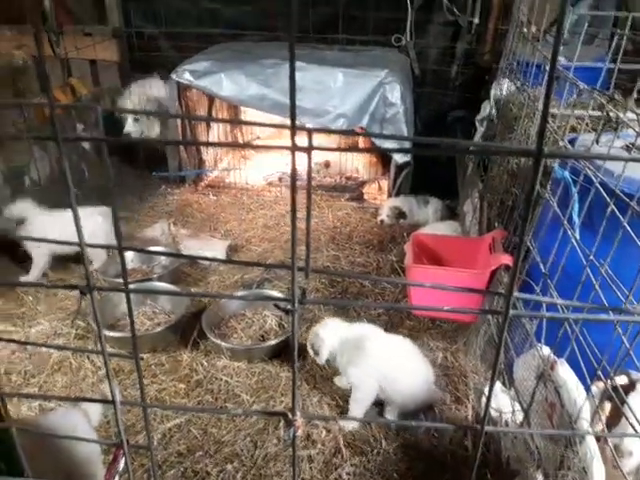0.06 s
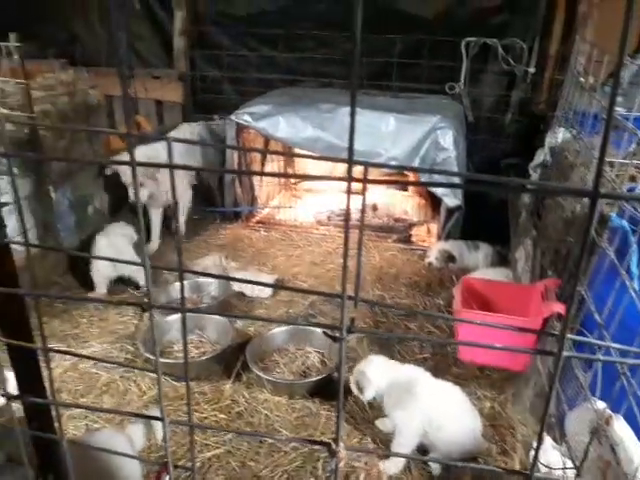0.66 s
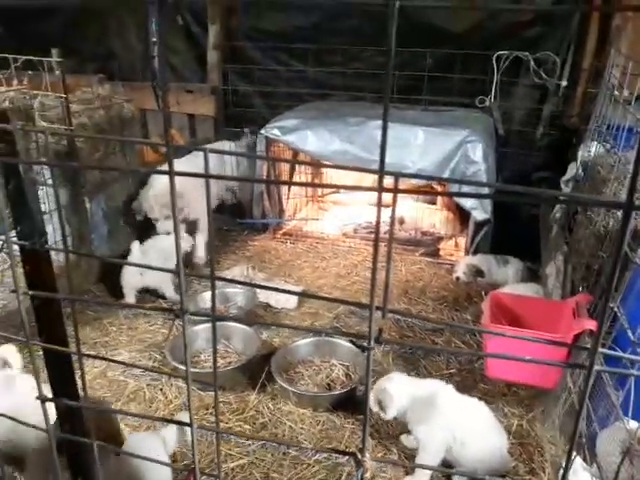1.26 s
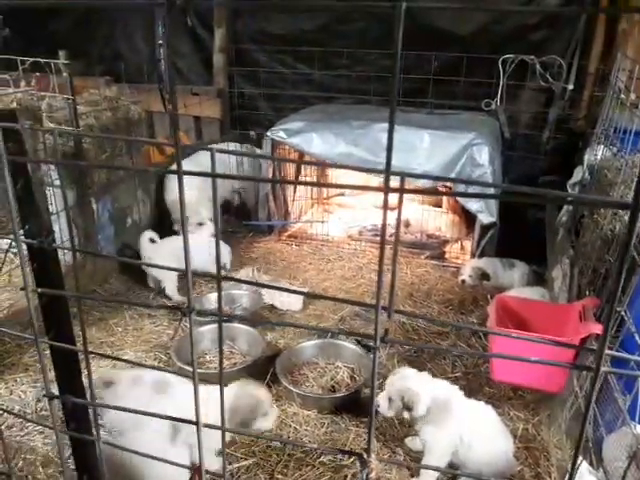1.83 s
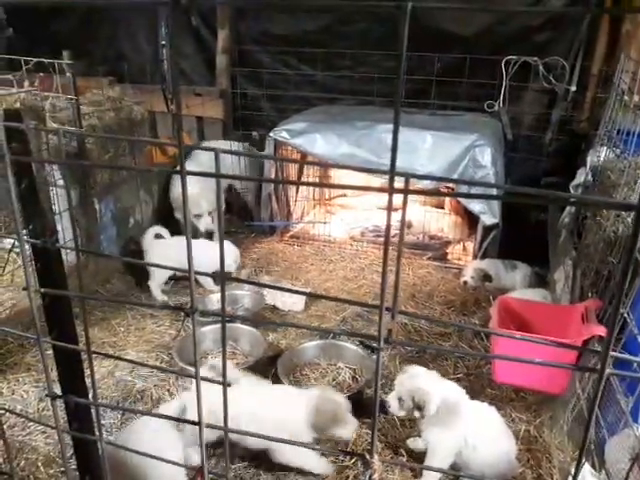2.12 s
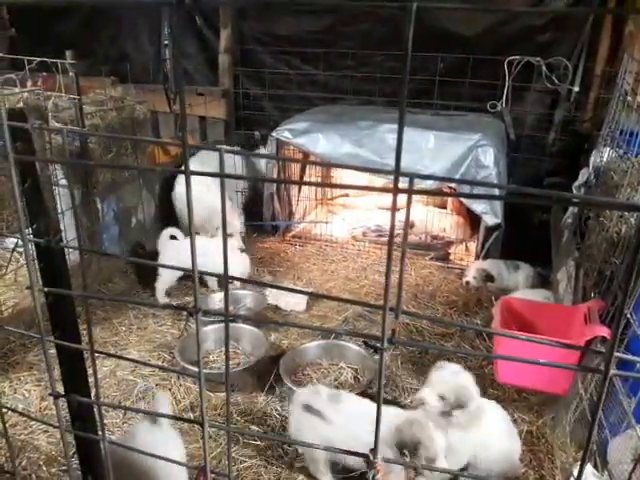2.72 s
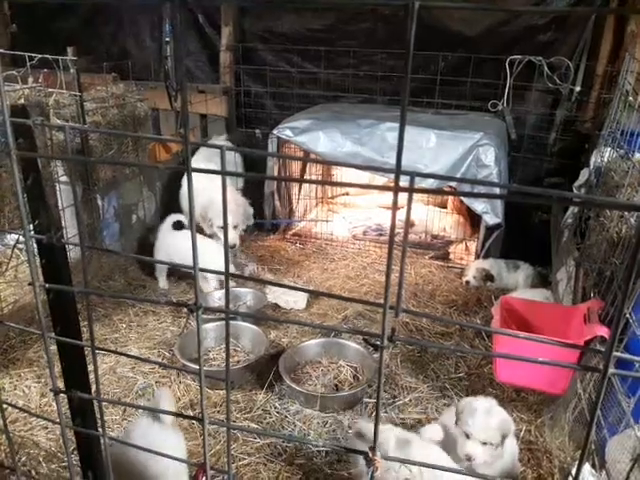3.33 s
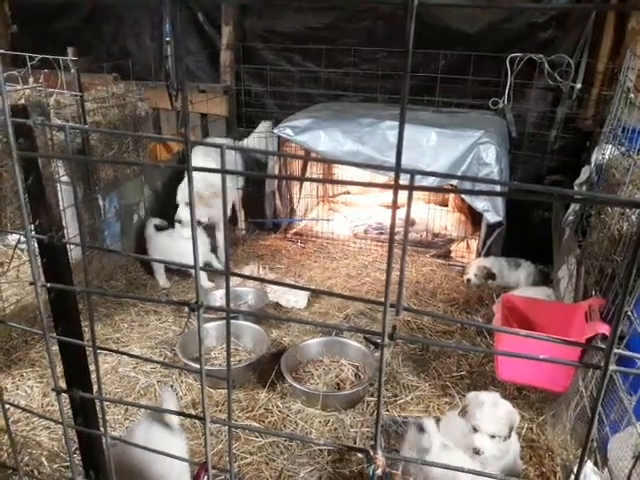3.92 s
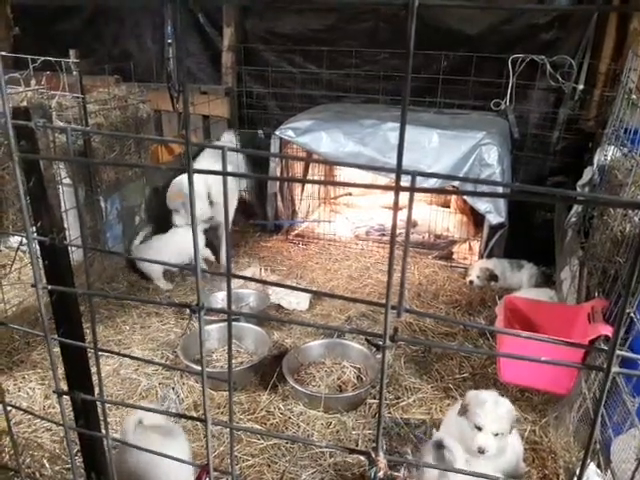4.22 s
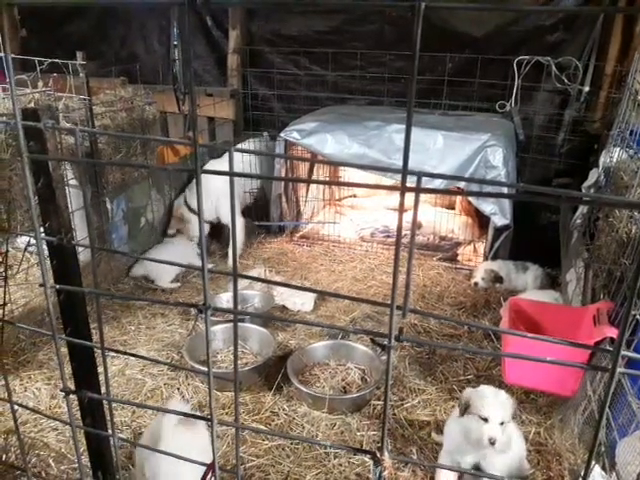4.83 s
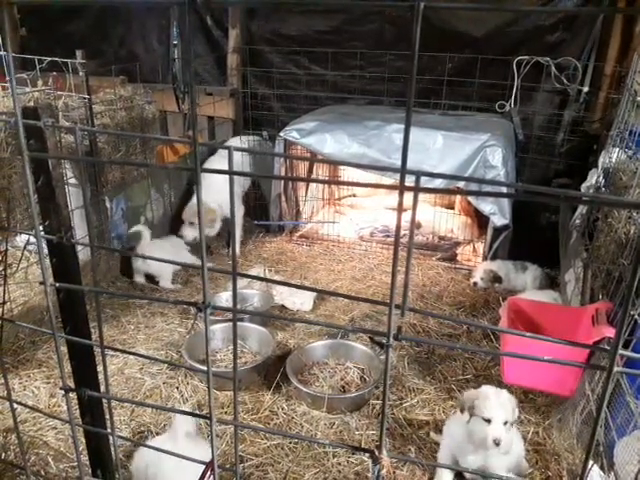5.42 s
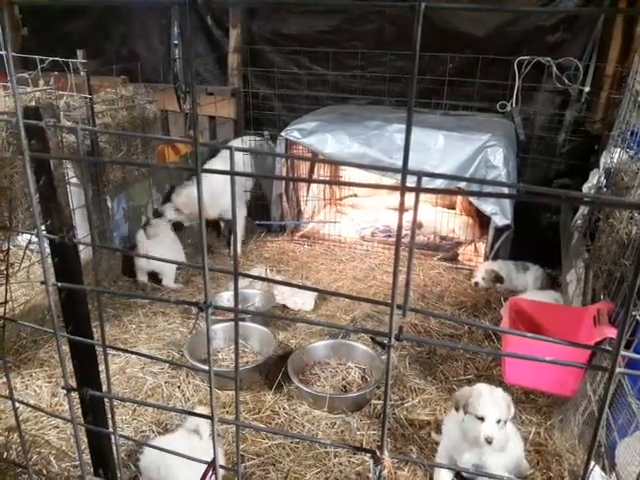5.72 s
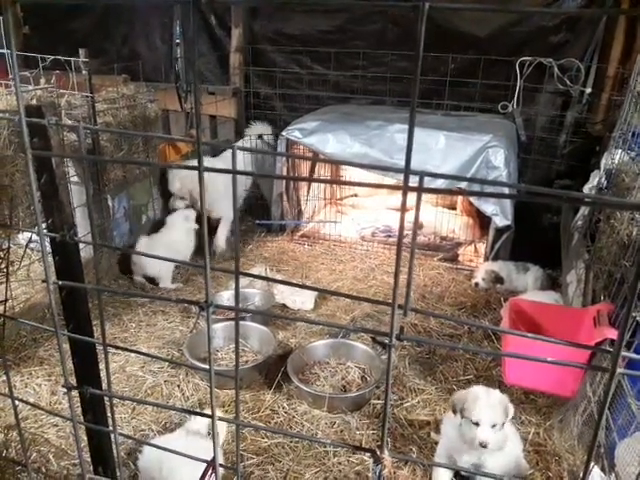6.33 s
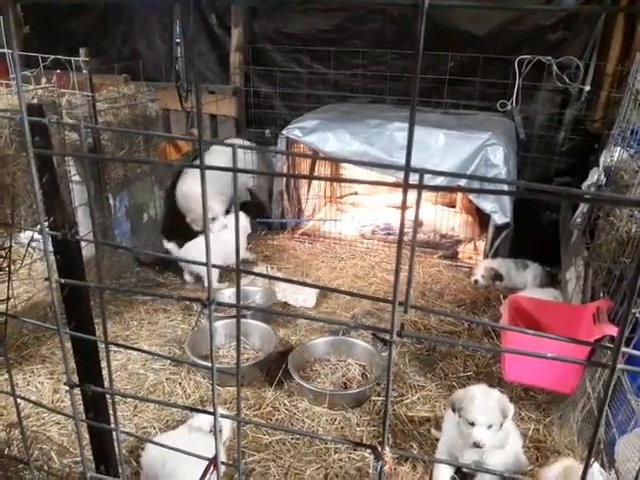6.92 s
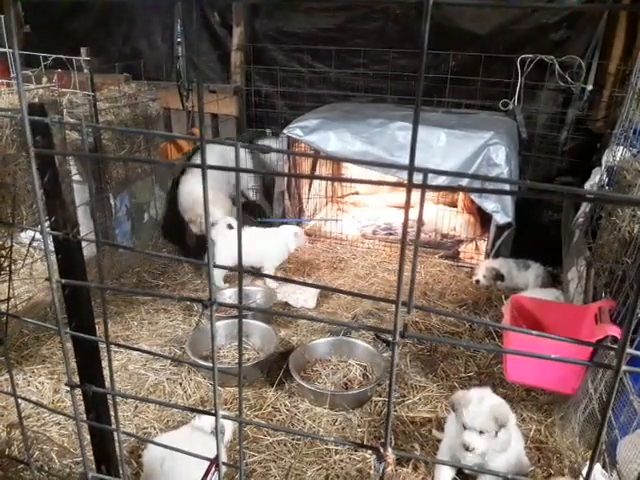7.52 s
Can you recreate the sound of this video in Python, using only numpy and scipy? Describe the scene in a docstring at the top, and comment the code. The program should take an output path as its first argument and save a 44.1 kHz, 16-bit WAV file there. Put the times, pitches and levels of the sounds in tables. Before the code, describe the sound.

Young puppies give a few short, high whines and small grunts while straw crackles under their paws. Midway their mother lets out two low, breathy woofs, the loudest sounds, and bodies bump and scrape hollow boards. More thin whines follow, then a last cluster of knocks with claws catching wire mesh. The barn adds a short echo and faint still air.

```python
"""A puppy's short whine over rustling straw comes first; more whines, yips and grunts follow in a barn pen.
Tight vocal folds sing the nearly pure whines, and thin nasal whistles lead into some of them.
Midway the mother pushes two low, breathy woofs through a half-closed mouth. Straw crackles under the
paws all the time, bodies bump and scrape the hollow boards, and claws catch the wire mesh.
The barn adds a short tail and a faint bed of air."""
import sys
import numpy as np
from scipy import signal
from scipy.fft import rfft, irfft, next_fast_len
from scipy.io import wavfile
from scipy.ndimage import uniform_filter1d

SR = 44100
rng = np.random.default_rng(int(sys.argv[2]) if len(sys.argv) > 2 else 0)


def unload_audio(sound):
    """Save the sound as a 16-bit wav file, at the path given as the first command line argument."""
    columns = np.transpose(np.atleast_2d(sound))
    # keep every value between -1 and 1, then stretch to whole-number steps
    steps = np.round(np.clip(columns, -1, 1) * 32767)
    wavfile.write(sys.argv[1], SR, steps.astype(np.int16))


N = 337806

# the melody of each whine, one list per call: time_s, pitch_hz
WHINE_TUNES = [
    [(0, 879), (.06, 887), (.08, 937), (.105, 880)],
    [(.868, 1369), (.92, 1345), (.955, 1240), (1.0, 1157), (1.055, 1070), (1.085, 866)],
    [(1.3, 955), (1.33, 1145), (1.39, 991), (1.44, 746), (1.475, 767), (1.51, 728.4), (1.585, 728)],
    [(1.71, 301.4), (1.775, 630), (1.803, 735), (1.83, 648), (1.89, 597)],
    [(4.897, 1336), (4.933, 1440), (4.955, 1292), (4.992, 1177)],
    [(5.255, 1300), (5.28, 1336), (5.305, 1245), (5.335, 1336), (5.36, 1155), (5.395, 1056), (5.46, 1088),
     (5.56, 1088), (5.59, 985)],
    [(6.94, 1060), (6.98, 989), (7.03, 766), (7.057, 865), (7.085, 761), (7.16, 788), (7.19, 690)],
]
# how each whine is voiced: fundamental_db, overtones_db, attack_s, release_s, press_time_s,
# fundamental_lift_db, overtone_lift_db, overtone_fade_db_per_s, tilt_db_per_octave, hoarseness (0-1)
WHINE_VOICINGS = [(-39, -40.5, 0.0019, 0.02, 0.056, 0, -6, 60, -28, 0.3),
                  (-39, -32.5, 0.024, 0.048, .97, 10, 3.5, 25, -0.5, .07),
                  (-37.5, -40.5, 0.015, 0.027, 1.538, 4.5, 4, -4, -1.5, 0.15),
                  (-39.5, -45.5, 0.062, 0.03, 1.795, 4, 5.5, -6, -21, 0.98),
                  (-40, -33, 0.0092, 0.03, 4.96, 2, 3, 35, 0, 0.1),
                  (-37, -33.5, .012, .015, 5.305, 5.5, 10, 10, 4, .02),
                  (-41.5, -51.5, 0.024, 0.022, 7.12, -4, 10.5, -6, -5.5, 0.05)]
# a puppy's throat, shaping the overtones: frequency_hz, gain_db
PUP_THROAT = [(600, -27), (1300, -2), (1550, -4), (1900, -39), (2250, 14), (2550, 10.5), (3000, -4.5),
              (3600, 10), (4100, -9.5), (4450, 5), (5000, -11), (5450, -0.5), (6300, -9.5), (7500, -16),
              (12000, -41)]
# nasal whistles: start_s, length_s, start_hz, middle_hz, end_hz, level_db
NASAL_WHISTLES = [(0.806, 0.097, 9150, 9400, 9200, -34), (4.871, 0.047, 9400, 9830, 9800, -33),
                  (5.24, .04, 8600, 8670, 8700, -32), (5.317, .03, 10450, 10500, 10650, -40),
                  (6.88, .12, 8000, 8170, 8050, -37)]
# small grunts and peeps: start_s, length_s, start_hz, middle_hz, end_hz, level_db
PUP_GRUNTS = [(0.282, 0.047, 357, 536, 620, -43), (0.748, 0.1, 297, 280.5, 240, -49.5),
              (2.013, 0.035, 237, 256, 211.5, -44)]
# the mother's woofs: start_s, length_s, voice_db, rasp_db, air_held_s, second_push_after_s,
# brightening_db_per_octave, dulling_db_per_octave_per_s
MOTHER_WOOFS = [(3.228, 0.26, -16.5, -30, 0.14, .151, 4, 18), (3.499, .3, -16, -31.5, 0.17, .152, 1, 59)]
# the formants of her throat: centre_hz, width_hz, gain_db
MOTHER_THROAT = [(661, 36, 7.5), (835, 55, 1), (1170, 124, -5.5), (1436, 380, -7), (2140, 55, -5.5),
                 (4350, 320, -24.5)]

# bodies bumping the boards: start_s, boom_db, scrape_db, rise_s, t60_s, centre_hz
BODY_BUMPS = [(3.919, -34.5, -37, 0.04, 1, 197), (4.039, -34, -25.5, 0.003, 0.45, 295),
              (4.072, -19.5, -26, 0.017, 0.36, 139), (4.139, -29, -44, .01, .17, 150),
              (4.5, -28.5, -50, 0.021, 0.34, 170), (4.505, -33.5, -31.5, 0.0035, 0.31, 700),
              (5.52, -44, -48.5, 0.0069, 0.94, 342), (7.216, -29.5, -36, 0.0084, 0.53, 266),
              (7.387, -23, -37, 0.019, 0.26, 270), (7.441, -33, -40, 0.0065, 0.95, 194),
              (7.551, -30.5, -41.5, 0.012, 0.36, 268)]
# light paw steps on the bedded floor: start_s, thud_db, scrape_db
PAW_STEPS = [(.205, -61, -44), (0.242, -57.5, -48.5), (.573, -61, -50), (.685, -52, -42.5),
             (1.21, -46, -44.5), (2.179, -56, -46.5), (2.511, -73, -45.5), (2.855, -51, -51),
             (6.46, -60, -64.5)]
# claws catching the wire mesh: start_s, ring_db, centre_hz
CLAW_CLINKS = [(2.228, -43.5, 1640), (7.212, -35, 910), (7.394, -30, 3200), (7.554, -33, 3100)]
# modes of boards and mesh, steadier in pitch the longer their ring: pitch_hz, gain_db, ring_s
BOARD_MODES = [(122.7, -4, 0.08), (170.6, -5.5, 0.077), (262.9, 0, 0.34), (310, -2, 0.081),
               (435, -6.5, 0.092), (753, -7, 0.48), (935, 3.5, 0.18), (1590, -11, 0.18), (3326, 9, 0.0021)]
# the colour of a scrape along the boards: frequency_hz, gain_db
SCRAPE_EQ = [(50, -31), (120, 3.5), (350, 5.5), (520, 3), (900, 2), (1500, -1), (2500, -2), (3400, -5.5),
             (6000, -17), (14000, -51)]
# a dip near 80 Hz that thins the boom of the boards: frequency_hz, gain_db
BOOM_DIP_EQ = [(45, 0.5), (80, -6.5), (115, 0.5)]

# how loud the straw rustle is over time: time_s, level_db
STRAW_LEVEL = [(0, -48), (1.65, -39.5), (2.45, -44), (3.35, -41.5), (3.48, -49), (3.97, -45.5), (4.15, -39),
               (4.5, -39), (4.7, -47.5), (5.5, -45), (5.75, -48.5), (6.38, -51.5), (6.52, -45),
               (7.16, -42.5), (7.31, -52), (7.5, -41.5), (7.66, -44.5)]
# sweeps of a paw or body through the straw: middle_s, length_s, level_db
STRAW_SWISHES = [(0.008, 0.25, -36.5), (0.242, 0.11, -37), (0.423, .06, -45), (0.54, 0.29, -42),
                 (0.692, 0.067, -37.5), (1.62, 0.17, -41.5), (1.812, 0.062, -35.5), (1.948, 0.095, -38.5),
                 (2.186, 0.14, -45), (2.768, .08, -41.5), (3.074, 0.059, -43.5), (3.3, 0.07, -38.5),
                 (3.784, 0.18, -44.5), (4.13, 0.054, -35), (4.39, .19, -37.5), (5.199, .12, -42.5),
                 (5.59, 0.096, -41.5), (6.03, 0.12, -44), (6.492, .08, -42), (6.805, 0.16, -46)]
# stalks snapping: start_s, relative_level_db
STALK_SNAPS = [(1.098, -40), (1.111, -32), (2.099, -36), (2.18, -36), (2.715, -29), (3.156, -35.5),
               (3.397, -42), (3.749, -36), (4.773, -38.5), (5.03, -37.5), (5.719, -47), (5.777, -48),
               (5.874, -32.5), (6.033, -36)]
# the colour of stirred straw: frequency_hz, gain_db
STRAW_EQ = [(60, -27), (140, -4.5), (350, -4), (600, -9.5), (1100, -10), (1600, -9.5), (2400, -0.5),
            (4200, 1), (5600, -5), (10000, -0.5), (16000, -11)]

# standing waves between the pen walls: pitch_hz, width_hz, gain_db
STANDING_WAVES = [(414, 4.5, -6), (1092, 5.5, -12)]
# the far walls throw the whines back: delay_s, gain_db
SLAPBACKS = [(.021, -14), (.049, -12)]
# the dull colour of those echoes: frequency_hz, gain_db
SLAPBACK_EQ = [(700, -6), (1200, 2), (2300, -18), (5000, -11)]
# the pups' reverb send, dipping where straw soaks up overtones: frequency_hz, gain_db
PUP_SEND_EQ = [(700, -1), (1250, 4), (2500, -4), (6000, 5)]
# how long the barn rings: frequency_hz, t60_s
BARN_DECAY = [(150, .7), (420, .75), (750, .48), (1300, .46), (3500, .33), (12000, .2)]
# the colour of still barn air: frequency_hz, gain_db
AIR_EQ = [(25, -33.5), (50, 0.5), (80, 9.5), (125, 9.5), (250, -0.5), (500, -15.5), (1200, -1),
          (4000, -1.5), (16000, -65)]
# the deep treble notch of the microphone port: frequency_hz, gain_db
MICROPHONE_EQ = [(5400, 1.5), (6300, -9), (7200, -21.5), (8300, -35.5), (9200, -29), (10000, -22),
                 (11200, -12), (13000, -9.5), (15700, 1)]

BAND_LIMIT_HZ = 15900


def whine(tune, voicing, press_half_s=.023, tremble_db=1.93, tremble_hz=52):
    """Tight vocal folds: a nearly pure tone whose overtones sweep through the throat as it glides."""
    low_db, high_db, attack, release, press_at, low_lift, high_lift, fade, tilt, hoarse = voicing
    times, pitches = np.transpose(tune)
    start, end = times[0], times[-1]
    t = np.arange(start, end, 1 / SR)
    hz = uniform_filter1d(np.interp(t, times, pitches), size=400, mode="nearest")
    hz *= 1 + (.004 + .015 * hoarse) * wander(len(t), 160)
    phase = 2 * np.pi * np.cumsum(hz) / SR
    k = np.arange(2, 9)[:, None]
    flutter_db = (1.2 + 9 * min(hoarse, .25)) * np.array([wander(len(t), 45) for _ in k])
    weights = gain_of(read(PUP_THROAT, k * hz) + tilt * np.log2(k) + flutter_db) * (k * hz < BAND_LIMIT_HZ)
    overtones = (weights * np.sin(k * phase)).sum(0) / np.linalg.norm(weights, axis=0)
    # at the top of a strained call the overtones break into a rasp
    breath = rng.standard_normal(len(t)) * (1 + np.cos(phase))
    rasp = unit_rms(formant(breath, hz=3600, width_hz=900))
    strain = np.clip(hoarse * (hz / hz.max()) ** 2, 0, 1)
    overtones = np.sqrt(1 - strain ** 2) * overtones + strain * rasp
    press = hump(t, press_at, press_half_s)
    airflow = np.clip((t - start) / attack, 0, 1) * np.clip((end - t) / release, 0, 1)
    # a pup cannot hold its level steady
    low = gain_of(low_db + low_lift * press + tremble_db * wander(len(t), tremble_hz))
    high_db = high_db + high_lift * press - fade * (t - start)
    high = gain_of(high_db + tremble_db * wander(len(t), tremble_hz))
    return start, np.sqrt(2) * airflow * (low * np.sin(phase) + airflow * high * overtones)


def peep(row, jitter, octave_gain):
    """A nasal whistle or small grunt: a short tone bending through three pitches."""
    start, length, start_hz, middle_hz, end_hz, db = row
    progress = np.linspace(0, 1, int(length * SR))
    bend = np.polyfit([0, .5, 1], [start_hz, middle_hz, end_hz], 2)
    hz = np.polyval(bend, progress) * (1 + jitter * wander(len(progress), 250))
    phase = 2 * np.pi * np.cumsum(hz) / SR
    tone = np.sin(phase) + octave_gain * np.sin(2 * phase)
    return start, gain_of(db) * unit_rms(tone * signal.windows.tukey(len(tone), .7))


def woof(row, start_hz=250, top_hz=431, sag_hz_per_s=720, peak_s=.071, push_half_s=.025, buzz=.3):
    """Two pushes of a strong fundamental, with rough puffs of air that dull as the mouth shuts."""
    start, length, voice_db, rasp_db, hold_s, second_s, brightening, dulling = row
    t = np.arange(0, length, 1 / SR)
    since_peak = np.maximum(t - peak_s, 0)
    # the pitch climbs with the push, then sags
    hz = top_hz - (top_hz - start_hz) * hump(t, 0, half_s=.043)
    hz -= sag_hz_per_s * np.maximum(since_peak - push_half_s, 0)
    airflow = gain_of(np.interp(t, [0, peak_s - push_half_s / 2, hold_s, length], [-17, 0, 0, -18.5]))
    main_push = hump(t, peak_s, push_half_s)
    push = main_push + gain_of(-7) * hump(t, second_s, half_s=.011) + gain_of(-13.5) * airflow
    push /= push.max()
    slack = np.clip(-20 * np.log10(push) / 9, .3, 1)  # the folds flap unevenly away from the peak
    cycles = np.cumsum(hz * (1 + .065 * slack * wander(len(t), 200))) / SR
    tone = np.sin(2 * np.pi * cycles) * (1 + .5 * slack * wander(len(t), 160))
    folds = unit_rms(sum(np.cos(2 * np.pi * k * cycles) for k in range(2, 12)))
    puffs = unit_rms((.5 + np.exp(-(cycles % 1) / .77)) * rng.standard_normal(len(t)))
    tilt = brightening * main_push - dulling * since_peak
    rasp = np.zeros(len(t))
    for centre_hz, width_hz, db in MOTHER_THROAT:
        octaves_up = np.log2(centre_hz / MOTHER_THROAT[0][0])
        rasp += gain_of(db + tilt * octaves_up) * formant(puffs + buzz * folds, centre_hz, 2 * width_hz)
    voice = np.sqrt(2) * gain_of(voice_db) * push * tone + gain_of(rasp_db) * airflow * unit_rms(rasp)
    return start, voice * signal.windows.tukey(len(t), .1)


def bump(start, boom_db, scrape_db, rise_s, t60_s, centre_hz, boom_trim_db=-3, focus_db_per_octave=9):
    """One hit: the boards boom in their modes while straw and claws scrape along them."""
    t = np.arange(SR // 2) / SR
    swell = np.minimum(t / rise_s, 1)
    fade = gain_of(-60 * np.maximum(t - rise_s, 0) / t60_s)
    modes = np.zeros(len(t))
    for hz, db, ring_s in BOARD_MODES:
        # heavier, softer contact has a lower centre and favours the lower modes
        weight = gain_of(db - focus_db_per_octave * abs(np.log2(hz / centre_hz)))
        rattle = .22 * wander(len(t), 2.2 / ring_s)
        modes += weight * np.cos(2 * np.pi * (hz * t + rng.random() + rattle))
    boom = gain_of(boom_db + boom_trim_db) * swell * unit_rms(modes)
    grit = unit_rms(equalise(crackle(len(t), clicks_per_s=4000, hiss=2.4), SCRAPE_EQ))
    return start, fade * (boom + gain_of(scrape_db) * np.sqrt(swell) * grit)


def pen_knocks():
    """Bodies, paws and claws all sound the same boards and mesh."""
    out = np.zeros(N)
    for row in BODY_BUMPS:
        add(out, *bump(*row))
    for start, thud_db, scrape_db in PAW_STEPS:
        add(out, *bump(start, thud_db, scrape_db, rise_s=.0056, t60_s=.59, centre_hz=380))
    for start, db, hz in CLAW_CLINKS:
        add(out, *bump(start, db, scrape_db=db - 10, rise_s=.0014, t60_s=.2, centre_hz=hz))
    return equalise(out, BOOM_DIP_EQ)


def straw_rustle(clump_db=1.5, clump_hz=22):
    """Stalks rub and crack in clumps; the level rises and dips, and swells under each sweep of a paw."""
    t = np.arange(N) / SR
    power = gain_of(np.interp(t, *np.transpose(STRAW_LEVEL))) ** 2
    for middle, length, db in STRAW_SWISHES:
        power += (gain_of(db) * hump(t, middle, length / 2)) ** 2
    level = np.sqrt(power) * gain_of(clump_db * wander(N, clump_hz))
    return level * unit_rms(equalise(crackle(N, clicks_per_s=1900, hiss=1), STRAW_EQ))


def straw_snaps(t60_s=.026, boost_db=2.5):
    """Single dry stalks break, each a tight burst of noise."""
    out, t = np.zeros(N), np.arange(2000) / SR
    for start, db in STALK_SNAPS:
        burst = unit_rms(equalise(rng.standard_normal(len(t)), STRAW_EQ))
        add(out, start, gain_of(db + boost_db - 60 * t / t60_s) * burst)
    return out


def pen_ring(calls):
    """Calls that hit a standing wave of the pen ring on."""
    return sum(gain_of(db) * resonate(calls, hz, width_hz) for hz, width_hz, db in STANDING_WAVES)


def wall_echoes(calls):
    """Dull single reflections beat against a gliding call and briefly outlast it."""
    out, dull = np.zeros(N), equalise(calls, SLAPBACK_EQ)
    for delay, db in SLAPBACKS:
        add(out, delay, gain_of(db) * dull)
    return out


def barn_reverb(send, predelay_s=.0068, reflections_per_s=2500):
    """Sparse reflections of random sign, each band dying at its own speed."""
    taps = rng.choice([-1., 1.], SR) * (rng.random(SR) < reflections_per_s / SR)
    taps *= np.arange(SR) > predelay_s * SR
    hz, t, bands = signal.stft(taps, SR, nperseg=256)
    t60 = read(BARN_DECAY, hz)[:, None]
    tail = signal.istft(bands * gain_of(-60 * t / t60) / np.sqrt(t60), SR, nperseg=256)[1]
    return signal.fftconvolve(send, tail / np.linalg.norm(tail))[:N]


def barn_air(level_db=-59):
    """Still air: a faint, steady bed of room tone."""
    return gain_of(level_db) * unit_rms(equalise(rng.standard_normal(N), AIR_EQ))


def crackle(size, clicks_per_s, hiss, spread_db=1.5):
    """Tiny clicks of unequal size over a smooth hiss."""
    clicks = rng.standard_normal(size)
    clicks *= gain_of(spread_db * np.minimum(rng.exponential(1, size), np.log(45)))
    clicks *= rng.random(size) < clicks_per_s / SR
    return unit_rms(unit_rms(clicks) + hiss * rng.standard_normal(size))


def wander(size, rate_hz):
    """Smooth random modulation, of rms near 1, rolling off above rate_hz."""
    span = max(size, SR)
    lowpass = np.exp(-(np.fft.rfftfreq(span, 1 / SR) / rate_hz) ** 2)
    return unit_rms(irfft(rfft(rng.standard_normal(span)) * lowpass, span))[:size]


def resonate(x, hz, width_hz):
    """A resonance with a peak gain of 1."""
    return signal.lfilter(*signal.iirpeak(hz, hz / width_hz, fs=SR), x)


def formant(x, hz, width_hz):
    """A throat resonance: two passes for steeper skirts."""
    return resonate(resonate(x, hz, width_hz), hz, width_hz)


def equalise(x, curve):
    """Filters by an EQ curve of frequency_hz, gain_db."""
    size = next_fast_len(len(x) + 2048)
    gains = gain_of(read(curve, np.fft.rfftfreq(size, 1 / SR)))
    return irfft(rfft(x, size) * gains, size)[:len(x)]


def read(curve, hz):
    """Reads a curve on a logarithmic frequency axis."""
    frequencies, values = np.transpose(curve)
    return np.interp(np.log(hz + 1), np.log(frequencies + 1), values)


def hump(t, middle_s, half_s):
    """A bell-shaped envelope of height 1."""
    return np.exp(-((t - middle_s) / half_s) ** 2)


def gain_of(db):
    """Decibels to amplitude."""
    return 10 ** (np.asarray(db) / 20)


def unit_rms(x):
    """Scales to rms 1."""
    return x / np.sqrt(np.mean(x ** 2) + 1e-20)


def add(mix, start_s, sound):
    """Drops a sound into the mix at its cue."""
    part = mix[max(0, round(start_s * SR)):][:len(sound)]
    part += sound[:len(part)]


def scene(pup_send_db=-11, mother_send_db=-10, board_send_db=-12, straw_send_db=-12):
    """The mono mix: dogs, boards and straw, each with its own send to the barn reverb."""
    pups, mother = np.zeros(N), np.zeros(N)
    for tune, voicing in zip(WHINE_TUNES, WHINE_VOICINGS):
        add(pups, *whine(tune, voicing))
    for row in NASAL_WHISTLES:
        add(pups, *peep(row, jitter=.014, octave_gain=0))
    for row in PUP_GRUNTS:
        add(pups, *peep(row, jitter=.18, octave_gain=.15))
    for row in MOTHER_WOOFS:
        add(mother, *woof(row))
    mother = equalise(mother, [(120, -12), (200, -5.5), (280, -1)])  # a narrow muzzle radiates little bass
    calls = pups + mother
    boards = pen_knocks()
    straw = straw_rustle() + straw_snaps()
    send = gain_of(pup_send_db) * equalise(pups, PUP_SEND_EQ) + gain_of(mother_send_db) * mother
    send += gain_of(board_send_db) * boards + gain_of(straw_send_db) * straw
    room = pen_ring(calls) + wall_echoes(pups) + barn_air() + barn_reverb(send)
    return (calls + boards + straw + room)[None]


def record(dry):
    """The microphone's colour, then a steep high cut."""
    heard = equalise(dry[0], MICROPHONE_EQ)
    high_cut = signal.firwin(511, BAND_LIMIT_HZ, window=("kaiser", 9), fs=SR)
    return signal.oaconvolve(heard, high_cut, "same")[None]


dry = scene()
out = record(dry)
unload_audio(out)
```